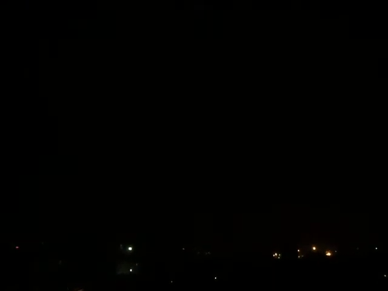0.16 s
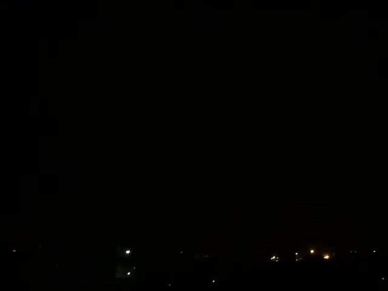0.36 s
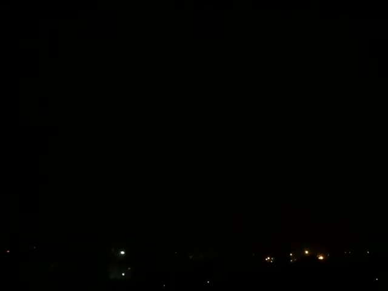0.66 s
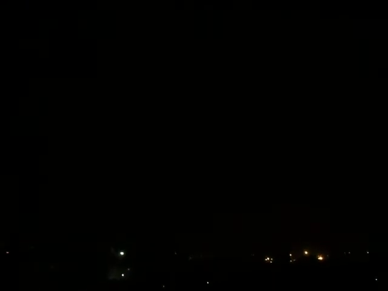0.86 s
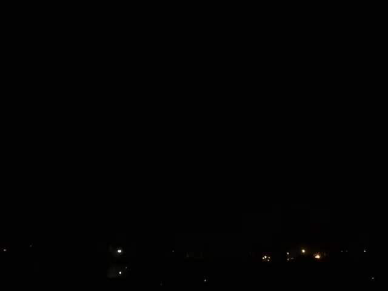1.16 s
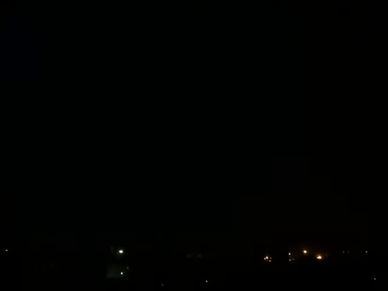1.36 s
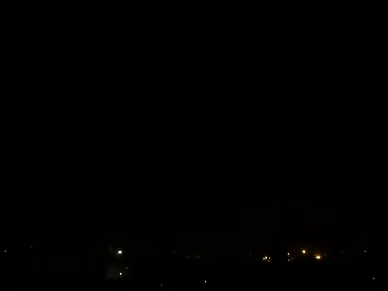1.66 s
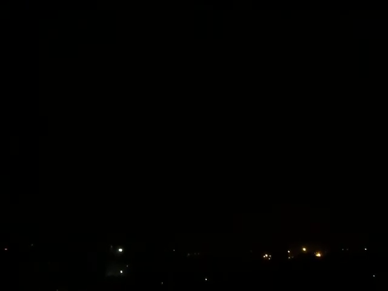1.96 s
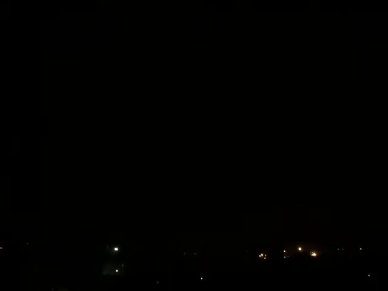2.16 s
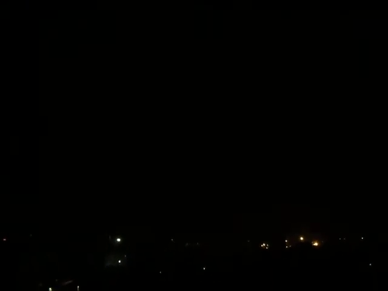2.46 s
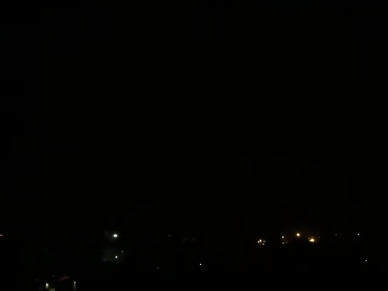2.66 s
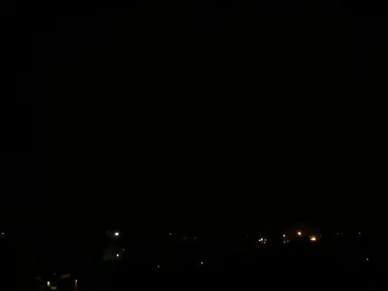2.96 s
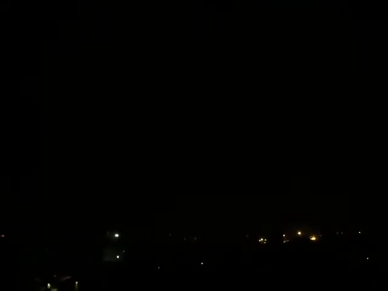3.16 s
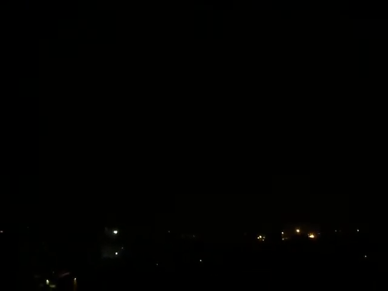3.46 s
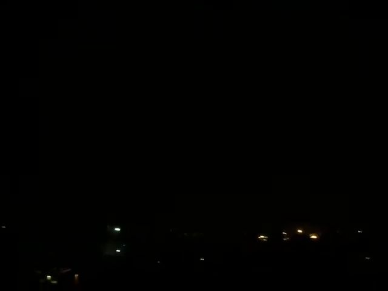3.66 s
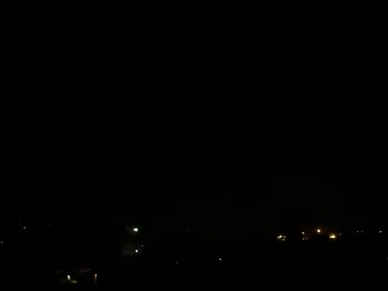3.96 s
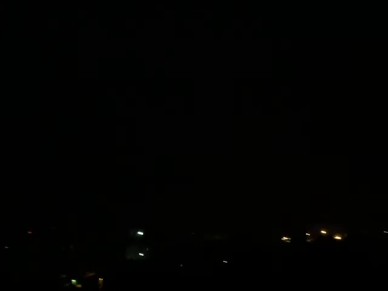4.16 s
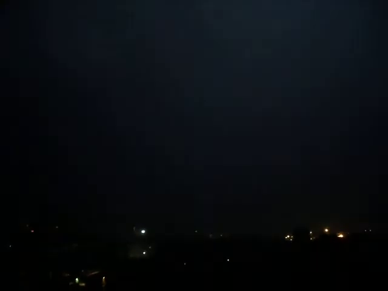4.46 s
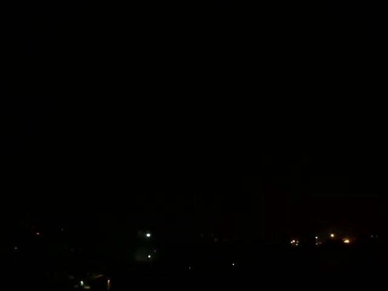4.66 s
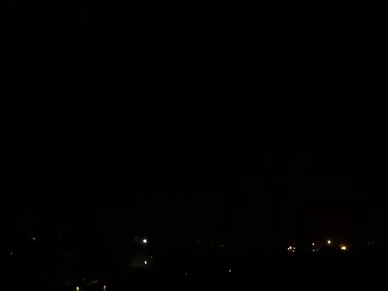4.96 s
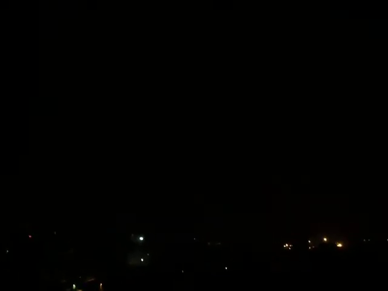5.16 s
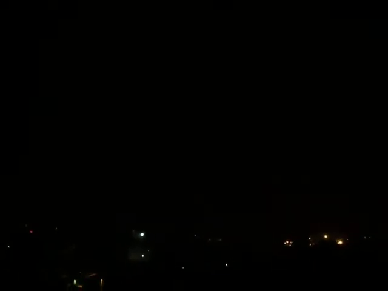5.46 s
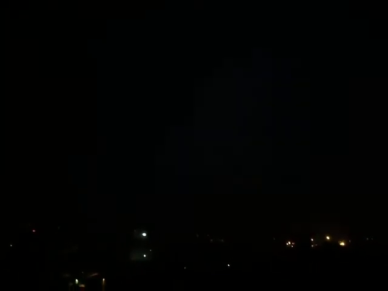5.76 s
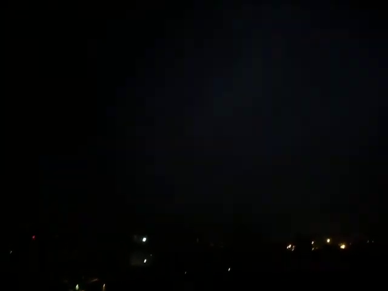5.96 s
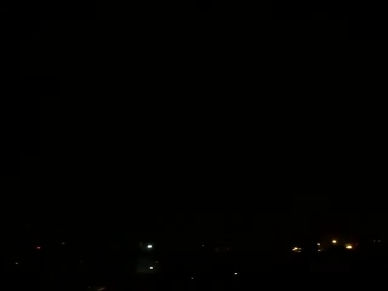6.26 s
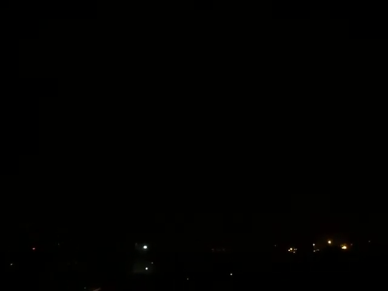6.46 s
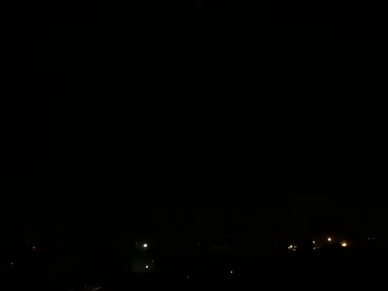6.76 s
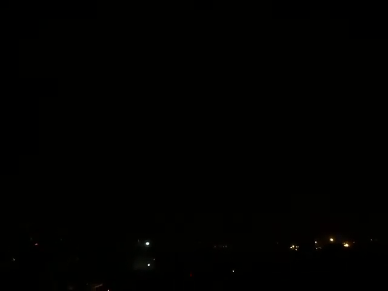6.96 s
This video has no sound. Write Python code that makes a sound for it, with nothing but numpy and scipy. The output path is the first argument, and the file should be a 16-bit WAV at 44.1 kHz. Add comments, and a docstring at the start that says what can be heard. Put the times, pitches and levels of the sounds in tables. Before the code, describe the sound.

Thunder cracks over soft, thickening rain, booms and rumbles through two deep swells, then dies away behind drips and small handling clicks.

```python
"""Thunder over rain: an old rumble mutters, a clap cracks, then rolls on in two long swells and fades.
Random impulses, filtered and evened out, make its rumble, roll and crackle; decaying sines make its shocks.
Rain is filtered noise under pattering impulses, slowly thickening. Drips splash as short bursts
of band-limited noise. A few handling clicks tick close to the microphone as noise snaps with a ringing
sine, and a dull low thump comes just before the last of them."""
import sys
import numpy as np
from scipy import signal
from scipy.fft import rfft, irfft, next_fast_len
from scipy.io import wavfile
from scipy.ndimage import uniform_filter1d, map_coordinates

SR = 44100
rng = np.random.default_rng(int(sys.argv[2]) if len(sys.argv) > 2 else 0)


def output_pcm(signal):
    """Save a mono or channel-first signal as 16-bit PCM at the path in sys.argv[1].

    Samples are clipped to [-1, 1] before scaling.
    """
    pcm = np.clip(np.atleast_2d(signal).T, -1, 1) * 32767
    wavfile.write(sys.argv[1], SR, np.round(pcm).astype(np.int16))


N = 312889


def amp(db):
    """Decibels to gain."""
    return 10 ** (np.asarray(db) / 20)


def unit(x):
    """Scale to rms 1."""
    return x / np.sqrt(np.mean(x ** 2) + 1e-20)


def along(points, hz):
    """Read (Hz, value) points on a log frequency axis."""
    f, v = np.transpose(points)
    return np.interp(np.log(hz + 1), np.log(f + 1), v)


def wobble(rate):
    """A smooth random curve, rate knots a second."""
    knots = rng.standard_normal(int(N * rate / SR) + 4)
    return map_coordinates(knots, [np.arange(N) * rate / SR])


def coloured(x, spectrum):
    """Minimum-phase filter with the gain of the (Hz, dB) points, so nothing sounds early."""
    m = 2 * next_fast_len(N // 2 + SR // 4)
    gain = amp(along(spectrum, np.fft.rfftfreq(m, 1 / SR)))
    cepstrum = irfft(np.log(gain), m)
    # folding the cepstrum forward in time makes the filter causal
    cepstrum[1:m // 2] *= 2
    cepstrum[m // 2 + 1:] = 0
    return irfft(rfft(x, m) * np.exp(rfft(cepstrum)), m)[:N]


def impacts(rate, scatter_db):
    """Impulses of random size and sign at random moments, rate a second."""
    hits = rng.random(N) < rate / SR
    sign = rng.choice([-1, 1], N)
    return hits * sign * amp(scatter_db * rng.standard_normal(N))


def add(track, s, sound):
    """Mix a sound into the track from time s."""
    start = max(round(s * SR), 0)
    track[start:start + len(sound)] += sound[:N - start]


WALL_S, WALL_SHARE = 0.0078, 0.25  # echo delay in seconds, echo gain


def wall(x):
    """A wall behind the microphone returns the thunder a moment later and hollows its tone."""
    echo = np.pad(x, (round(WALL_S * SR), 0))[:N]
    return x + WALL_SHARE * echo


def peal(spectrum, rate, scatter_db, even_s):
    """Shocks from countless bends of the lightning channel merge into a sound of even strength."""
    x = unit(wall(coloured(impacts(rate, scatter_db), spectrum)))
    power = uniform_filter1d(x ** 2, max(int(even_s * SR), 1))
    return x / np.sqrt(np.abs(power) + 1e-3)


# Claps, from channel branches that lie side-on and arrive all at once. Each row: peak time in seconds,
# roll level in dB, crackle in dB relative to the roll, deep rumble in dB relative to the roll.
CLAP_PEALS = [(1.51, -32, -8, -9), (1.593, -25.5, -8.5, -7), (1.645, -27.5, -10, -9.5), (1.78, -35, -7, -9),
              (2.024, -38.5, -3, 4), (4.126, -38.5, -11, -14), (4.841, -30, -13, -1)]
CLAP_RISE_S, CLAP_FADE_DB_PER_S = 0.042, 98
# Rolls, from long stretches of channel leading away. Each row: peak time in seconds, roll level in dB,
# crackle in dB relative to the roll, deep rumble in dB relative to the roll, rise in seconds.
ROLL_PEALS = [(.2, -52.5, -10.5, -3, 0.098), (.85, -44.5, -12.5, -7.5, 0.35), (1.8, -33.5, -9, -4.5, 0.043),
              (2.48, -38.5, -11.5, -2, 0.058), (3.0, -40.5, -10, -2, 0.3), (3.38, -32.5, -17.5, -1, .35),
              (3.58, -32.5, -13.5, -9, 0.14), (4.66, -31.5, -14, -4, 0.38), (5.14, -39.5, -9.5, -3, 0.29),
              (5.97, -42.5, -9, -6.5, 0.25), (6.5, -44.5, -14.5, -1.5, 0.14), (7.0, -42, -12, -4, 0.091)]
ROLL_FADE_DB_PER_S = 14
RISE_DB = 10  # a peal gains this much over its rise time
# The distant storm under it all. One row: deep rumble in dB, roll in dB, crackle in dB.
MUTTER_LEVELS = (-55.5, -54.5, -65.5)


def strength():
    """Peals swell to a peak, then lose steady dB a second; powers add. Gives dB of rumble, roll, crackle."""
    t = np.arange(N) / SR
    power = amp(MUTTER_LEVELS)[:, None] ** 2 + np.zeros(N)
    peals = [(*row, CLAP_RISE_S, CLAP_FADE_DB_PER_S) for row in CLAP_PEALS]
    peals += [(*row, ROLL_FADE_DB_PER_S) for row in ROLL_PEALS]
    for s, db, crackle_db, deep_db, rise, fade in peals:
        below_db = np.where(t < s, RISE_DB * ((s - t) / rise) ** 2, fade * (t - s))
        envelope = amp(-np.minimum(below_db, 100))
        levels = amp([db + deep_db, db, db + crackle_db])
        power += np.outer(levels, envelope) ** 2
    return 10 * np.log10(power)


# Tone of the deep rumble. Each row: frequency in Hz, gain in dB.
RUMBLE_TONE = [(8, -35), (22, -5.5), (36, 3), (55, -6), (68, -6.5), (84, 7.5), (102, 1.5), (118, -2),
               (160, -37), (400, -100)]
# Tone of the roll, the body of the thunder. Each row: frequency in Hz, gain in dB.
ROLL_TONE = [(70, -21), (100, -19), (118, -3.5), (146, -0.5), (185, -3), (205, -1.5), (235, -7),
             (262, -7.5), (315, -9.5), (370, -14), (450, -29.5), (650, -39), (1500, -100)]
# Tone of the crackle. Each row: frequency in Hz, gain in dB.
CRACKLE_TONE = [(200, -28.5), (330, -9), (420, 2.5), (510, -2), (570, -3.5), (650, -4), (800, -8),
                (1050, -12), (1400, -20.5), (2000, -33), (5000, -82)]
# the crackle's edge when it is as loud as the roll, and how fast it dulls as the crackle sinks below
EDGE_DB, EDGE_PER_DB = 7.5, 1.1


def thunder(edge_hz=720, lumps_db=0.95, lumps_rate=14):
    """Near parts of the channel crackle; air strips far parts down to a roll and a deep rumble."""
    rumble_db, roll_db, crackle_db = strength()
    rumble = amp(rumble_db) * peal(RUMBLE_TONE, rate=600, scatter_db=0.5, even_s=0.13)
    roll = amp(roll_db) * peal(ROLL_TONE, rate=2500, scatter_db=1.5, even_s=0.093)
    crackle = amp(crackle_db) * peal(CRACKLE_TONE, rate=2000, scatter_db=3.0, even_s=0.048)
    # split off the crackle's edge, which stands out more the louder the crackle is beside the roll
    lowpass = signal.butter(3, edge_hz, fs=SR, output="sos")
    dull = signal.sosfiltfilt(lowpass, crackle)
    edge_db = EDGE_DB + EDGE_PER_DB * (crackle_db - roll_db)
    edge = amp(edge_db) * (crackle - dull)
    lumps = amp(lumps_db * wobble(lumps_rate))
    return lumps * (rumble + roll + dull + edge)


# Tone of the rain. Each row: frequency in Hz, gain in dB.
RAIN_TONE = [(100, -18), (500, 8.5), (1200, 3.5), (2000, -1), (2600, -3), (3400, -3.5), (4500, -6.5),
             (6500, -11.5), (9000, -13), (10100, -14), (10900, -16.5)]
RAIN_DB, RAIN_GROWS_DB_PER_S = -61.5, 0.2855  # hiss level at the start; the shower slowly thickens


def rain(patter_db=-7):
    """Far drops merge into a hiss, nearer ones patter in flurries."""
    shower_db = RAIN_DB + RAIN_GROWS_DB_PER_S * np.arange(N) / SR
    hiss = amp(0.61 * wobble(16)) * unit(coloured(rng.standard_normal(N), RAIN_TONE))
    flurry_db = 2 * wobble(14)
    drops = unit(coloured(impacts(rate=1200, scatter_db=2.5), RAIN_TONE))
    patter = amp(patter_db + flurry_db) * drops
    return amp(shower_db) * (hiss + patter)


def splash(hz, length, octaves):
    """A burst of fine spray, noise around one pitch, that swells to a peak at twice length and dies."""
    t = np.arange(SR // 4) / SR
    f = np.fft.rfftfreq(len(t), 1 / SR)
    band = np.exp(-0.5 * (np.log2((f + 1) / hz) / octaves) ** 2)
    spray = unit(irfft(rfft(rng.standard_normal(len(t))) * band, len(t)))
    swell = t / (2 * length)
    return spray * (swell * np.exp(1 - swell)) ** 4


# The loudest drips splashing nearby. Each row: peak time in seconds, level in dB, centre in Hz,
# length in seconds (half the swell time).
LOUD_SPLASHES = [(0.221, -64.5, 4270, 0.018), (0.614, -62, 3380, 0.013), (.72, -60, 1330, 0.0078),
                 (1.229, -63, 1500, .012), (1.445, -61.5, 3370, 0.011), (1.646, -60, 2660, 0.0069),
                 (2.935, -69, 6000, 0.014), (3.046, -66, 3800, .014), (3.172, -61, 3180, .007),
                 (3.716, -69, 7000, 0.013), (3.884, -63, 3680, 0.0087), (4.37, -55, 1280, 0.013),
                 (4.954, -48.5, 1490, 0.0045), (6.042, -61.5, 3380, 0.025), (6.083, -60, 5030, .005),
                 (6.188, -61, 1850, .012)]
# softer splashes at random: level, centre, its scatter either way, length
SPRAY_DB, SPRAY_HZ, SPRAY_OCTAVES, SPRAY_S = -69, 4550, 0.45, 0.016


def drips(faint_db=-70, count=45, size=12):
    """Water falls from the eaves: loud splashes, softer ones at random, and faint plinks in between."""
    out = np.zeros(N)
    soft = []
    for k, (when, pitch) in enumerate(rng.random((size, 2))):
        s = (k + when) / size * N / SR  # one in each equal slice of time
        hz = SPRAY_HZ * 2 ** (SPRAY_OCTAVES * (2 * pitch - 1))
        soft.append((s, SPRAY_DB, hz, SPRAY_S))
    for s, db, hz, length in LOUD_SPLASHES + soft:
        octaves = 0.2 + 16 * length  # longer splashes throw a wider mix of droplet sizes
        add(out, s - 2 * length, amp(db) * splash(hz, length, octaves))
    for when, loudness, pitch, life in rng.random((count, 4)):
        plink = splash(1200 * 4 ** pitch, 0.0016 + 0.0053 * life, octaves=0.078)
        add(out, when * N / SR, amp(faint_db) * (1 + loudness) * plink)
    return out


# The strongest shock fronts. Each row: start in seconds, peak in dB before the air, pitch in Hz.
SHOCK_FRONTS = [(1.46, -31, 596), (1.487, -24, 585), (1.504, -15.5, 274), (1.581, -20, 563),
                (1.611, -31, 218), (1.623, -29, 600), (1.751, -24.5, 410), (1.771, -14.5, 241),
                (1.829, -20, 222), (1.994, -26, 503), (2.026, -22, 298), (2.422, -20.5, 243),
                (2.955, -25, 199), (3.301, -14.5, 90.5), (3.399, -18, 108), (4.117, -19.5, 140),
                (4.441, -29, 240), (4.813, -25, 114), (4.88, -18, 114)]
# Echoes off nearby walls. Each row: frequency in Hz, time to decay by 60 dB in seconds.
WALL_ECHOES = [(60, 0.22), (250, 0.04), (1000, 0.052)]
# What distance leaves of a shock front. Each row: frequency in Hz, gain in dB.
AIR_TONE = [(30, -21.5), (90, -3), (650, -3), (1300, -5.5), (2600, -47), (6000, -81)]


def shocks(echo_db=-7):
    """Each strong front is a steep push and a suction, scattered by nearby walls and dulled by the air."""
    out, t = np.zeros(N), np.arange(SR // 8) / SR
    for s, db, hz in SHOCK_FRONTS:
        cycles = hz * t
        front = np.sin(2 * np.pi * cycles) * np.exp(-1.2 * cycles)
        # noise that decays at its own pace in each band
        f, age, z = signal.stft(rng.standard_normal(len(t)), SR, nperseg=256)
        decay = amp(-60 * age / along(WALL_ECHOES, f)[:, None])
        scatter = signal.istft(z * decay, SR, nperseg=256)[1]
        echo = signal.fftconvolve(front, scatter)[:len(t)]
        boom = unit(front) + amp(echo_db) * unit(echo)
        add(out, s, amp(db) * boom / np.abs(boom).max())
    return coloured(out, AIR_TONE)


# Sharp clicks close by, probably from handling. Each row: start in seconds, peak in dB before the tone
# filter, ring in Hz.
HANDLING_CLICKS = [(1.7105, -42, 10400), (6.0845, -43, 9300), (6.0878, -36.5, 3330), (6.139, -42, 4800),
                   (6.1488, -34, 8900)]
# Tone of the clicks. Each row: frequency in Hz, gain in dB.
CLICK_TONE = [(500, -24), (1700, 1), (3200, 8), (5300, 2), (7200, 0), (9300, 1.5), (10500, 0), (11500, -18)]


def clicks(ring_db=-9, snap_t60=0.0058, ring_t60=0.01):
    """A handling click: a dry snap of fast-dying noise with a short ring."""
    out, t = np.zeros(N), np.arange(SR // 50) / SR
    for s, db, hz in HANDLING_CLICKS:
        snap = rng.standard_normal(len(t)) * amp(-60 * t / snap_t60)
        ring = np.sin(2 * np.pi * hz * t) * amp(-60 * t / ring_t60)
        click = unit(snap) + amp(ring_db) * unit(ring)
        add(out, s, amp(db) * click / np.abs(click).max())
    return coloured(out, CLICK_TONE)


def bump(s=6.064, db=-28, hz=125, length=0.0069):
    """A soft, dull thump just before the last clicks: a low sine that swells over length and dies."""
    out, t = np.zeros(N), np.arange(SR // 10) / SR
    swell = (t / length) * np.exp(1 - t / length)
    add(out, s, amp(db) * np.sin(2 * np.pi * hz * t) * swell)
    return out


def scene():
    """Thunder behind the rain, in one channel."""
    return (thunder() + rain() + drips() + shocks() + clicks() + bump())[None]


# Treble roll-off of the microphone. Each row: frequency in Hz, gain in dB.
MICROPHONE_TONE = [(9900, 0.5), (10300, -1), (10900, -11.5), (11800, -15)]
TOP_HZ = 11843  # band limit


def record(dry):
    """The microphone dulls the top treble and keeps nothing above its band limit."""
    m = next_fast_len(N + SR // 2)
    hz = np.fft.rfftfreq(m, 1 / SR)
    gain = amp(along(MICROPHONE_TONE, hz)) * (hz < TOP_HZ)
    return irfft(rfft(dry, m) * gain, m)[..., :N]


dry = scene()
out = record(dry)
output_pcm(out)
```